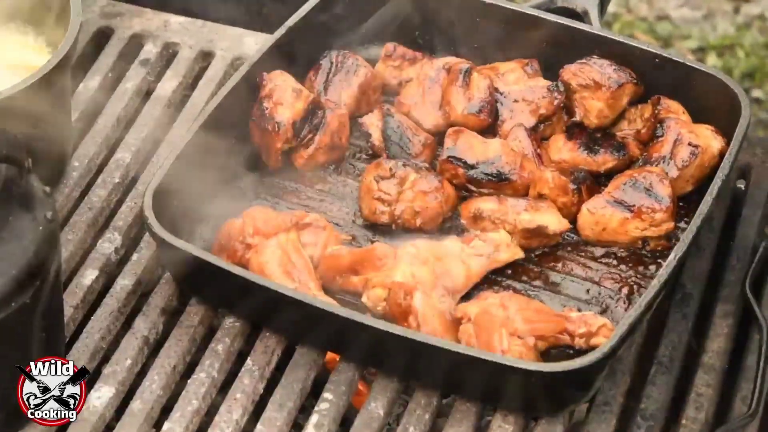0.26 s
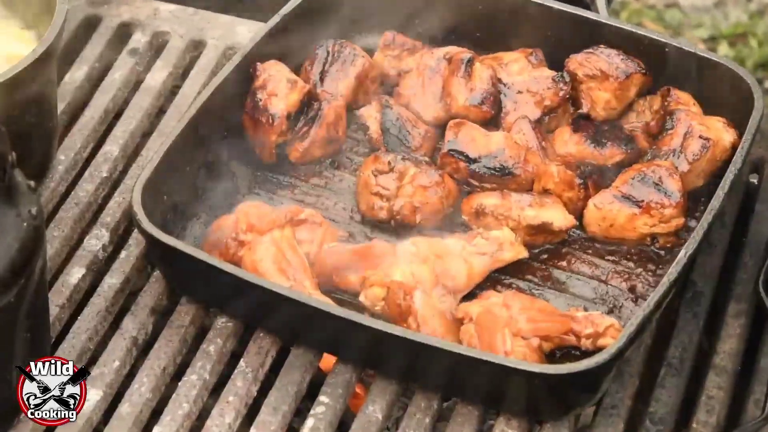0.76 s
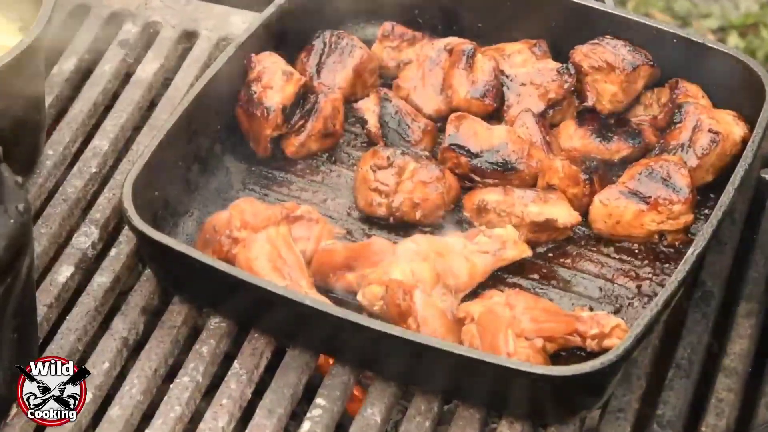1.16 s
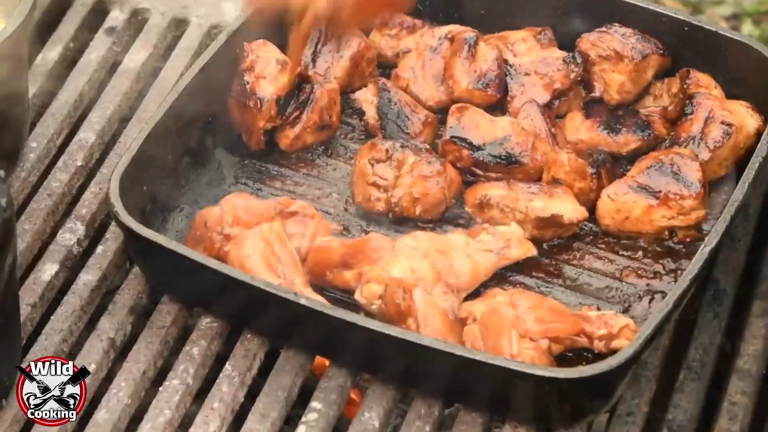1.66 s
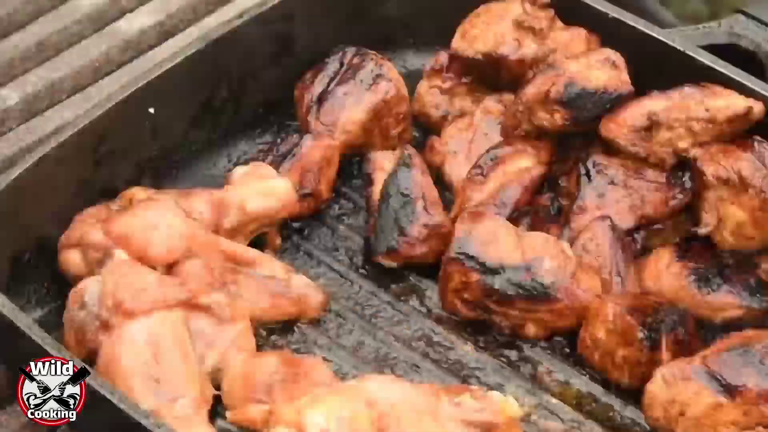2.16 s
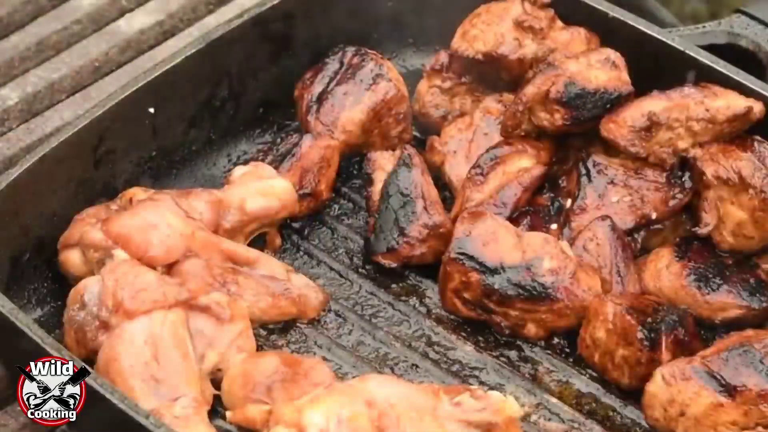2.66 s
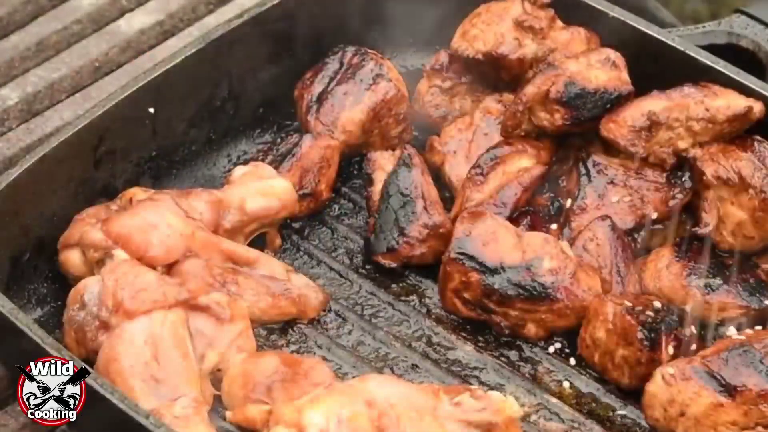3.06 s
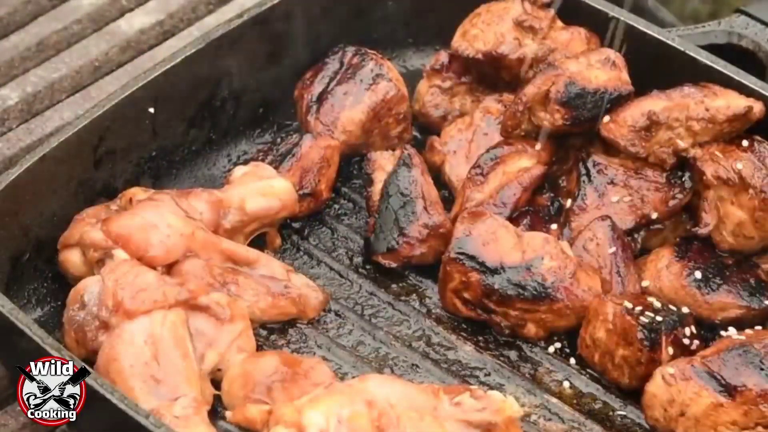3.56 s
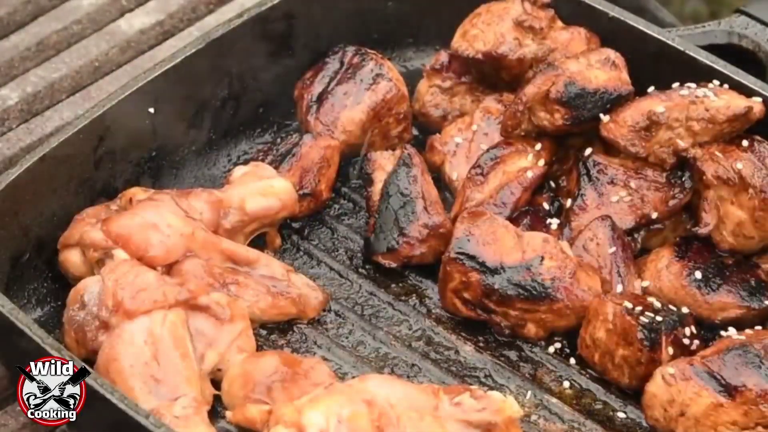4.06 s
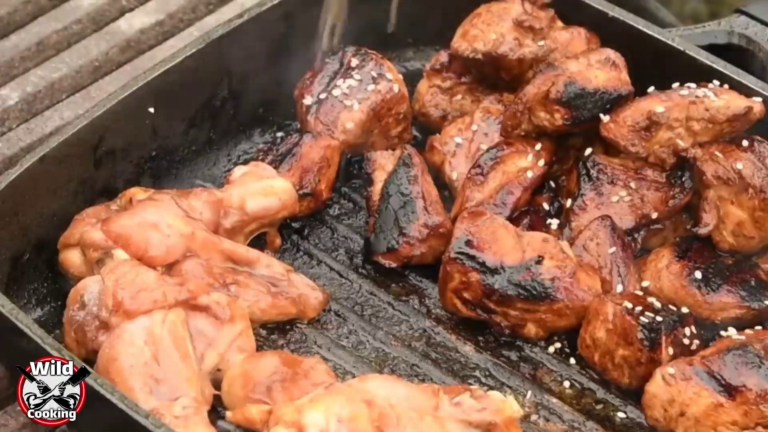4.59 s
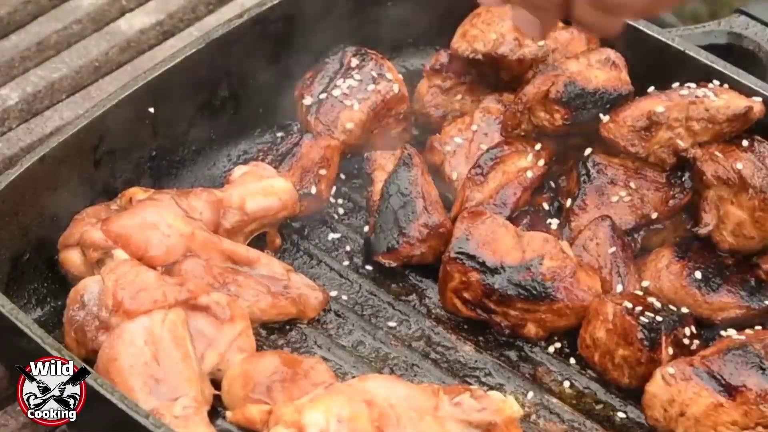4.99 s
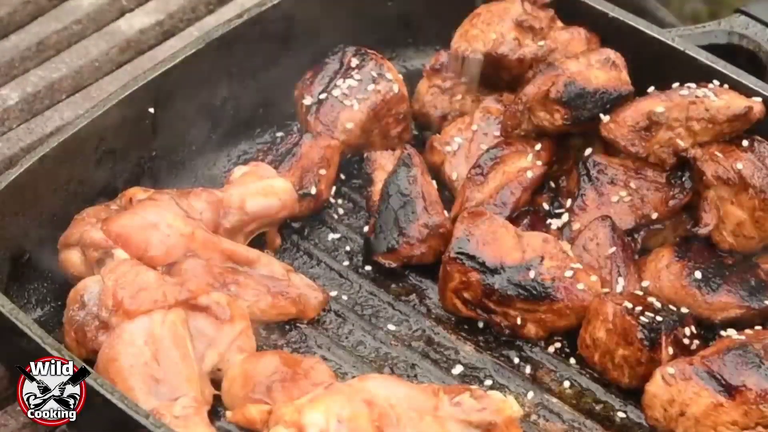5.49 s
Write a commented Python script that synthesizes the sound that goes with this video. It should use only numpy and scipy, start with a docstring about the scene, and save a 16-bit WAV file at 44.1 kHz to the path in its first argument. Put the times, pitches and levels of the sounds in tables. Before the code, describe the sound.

Close, bright sizzling of meat on cast iron surges, then settles lower, with sharp fat spits, soft knocks and a faint fire rumble.

```python
"""Chicken pieces sizzle in a cast-iron grill pan over an open fire, outdoors, close to a camera's mic.
Thousands of steam bubbles burst in the hot fat each second; a piece laid on the iron flares up. Near
2.35 s the level drops abruptly to a quieter, steady hiss. Single drops spit and a few dull knocks sound
over a low rumble of fire and air. A limiter ducks briefly after the loudest spits."""
import sys
import numpy as np
from scipy import signal
from scipy.fft import rfft, irfft
from scipy.io import wavfile
from scipy.ndimage import uniform_filter1d, minimum_filter1d

SR = 44100
rng = np.random.default_rng(int(sys.argv[2]) if len(sys.argv) > 2 else 0)


def digitize_waveform(pressure):
    """Quantize a signal to 16-bit integers and store it at the path in sys.argv[1].

    Rows of a 2-D input are taken as channels; values are limited to [-1, 1].
    """
    field = np.atleast_2d(pressure).T
    bounded = np.clip(field, -1, 1)
    quanta = np.round(bounded * 32767).astype(np.int16)
    wavfile.write(sys.argv[1], SR, quanta)


N = 252693
TIME = np.arange(N) / SR
HZ = np.fft.rfftfreq(N, 1 / SR) + 1e-3


# Level of the sizzle at the microphone; it drops abruptly near 2.35 s to a quieter, steady hiss.
# Each row: time in seconds, relative level in dB.
SIZZLE_LEVEL = [(0, 3.5), (.2, 1.5), (.42, 3), (.62, 0.5), (.77, .5), (.88, 3), (1.1, 2.2), (1.42, 3),
                (1.77, 2.5), (2.02, 2), (2.2, 4.5), (2.325, 3.5), (2.42, -0.8), (2.64, 0.5), (3.3, .5),
                (3.55, -0.8), (4.68, -.5), (4.85, 0), (5.4, -0.7)]
# Juices boil up under the meat in large bubbles, or the simmer briefly sinks back. # Each row: centre in
# seconds, half length in seconds, change of the simmer in dB.
SIMMER_CHANGES = [(.02, 0.046, 3.5), (.84, 0.066, 3.5), (1.14, 0.037, -5.5), (1.41, 0.014, 4),
                  (2.18, .08, -0.5), (2.68, 0.03, 2.7), (3.07, .06, 3), (3.38, 0.028, -2), (4.42, 0.03, 3),
                  (5.34, 0.037, -5.5)]

def frying(simmer_db=-33, bubbling_db=-29, sizzle_db=-24.5, spray_db=-33.5, mist_db=-49):
    """Wet meat on hot iron makes bubbles from large to fine, each at its own level, over a rumble."""
    sound = bubbles()
    level_db, boil_db, fine_db = follow(SIZZLE_LEVEL), swells(SIMMER_CHANGES), spray_change_db()
    edges = [lowpass(hz) for hz in (300, 1200, 2400, 4400, 10500)]
    bands = np.diff(edges, axis=0, prepend=0, append=1)
    bass, simmer, bubbling, sizzle, spray, mist = (unit_rms(filtered(sound, band)) for band in bands)
    return (simmer * gain_of(0.13 * level_db + boil_db + simmer_db)
            + bubbling * gain_of(0.83 * level_db + 0.27 * boil_db + bubbling_db)
            + pan_resonance(sizzle, level_db) * gain_of(level_db + 0.083 * fine_db + sizzle_db)
            + spray * gain_of(fine_db + spray_db)
            + mist * gain_of(1.42 * fine_db + mist_db)  # the finest mist grows faster than the spray
            + fire_rumble(bass))


# All the bursting bubbles, heard close to the pan. Each row: frequency in Hz, relative level in dB.
BUBBLE_SPECTRUM = [(30, -39), (55, -32.5), (100, -21), (150, -18.5), (180, -9.5), (310, -11), (1000, -6),
                   (1400, 1), (2600, 3), (3600, 2), (4800, -9.5), (8000, -20), (10000, -24.5),
                   (14000, -39.5)]

def bubbles(band_count=15, hiss_share=0.57, fizz_share=0.43, fizz_s=0.002):
    """Each size of bubble bursts around its own pitch; the finest burst most unevenly."""
    root_pitches = np.linspace(np.sqrt(200), np.sqrt(14000), band_count)
    width = 1.68 * (root_pitches[1] - root_pitches[0])
    bands = np.exp(-.5 * ((np.sqrt(HZ) - root_pitches[:, None]) / width) ** 2) + 1e-9
    bands /= np.linalg.norm(bands, axis=0)
    steam_db = 0.76 * flutter(seconds=0.027)  # steam escapes from under the meat in spurts
    fine_db = spray_change_db()
    hiss = hiss_share * gain_of(1.05 * (fine_db - fine_db.mean()))  # more spray crowds bursts into hiss
    fizz_decay = np.exp(-1 / (fizz_s * SR))
    out = np.zeros(N)
    for pitch, band in zip(root_pitches ** 2, bands):
        spread_db = np.interp(pitch, [500, 3500, 8000], [2.9, 2.7, 4.5])
        per_s = np.interp(pitch, [500, 3500, 8000], [800, 1400, 800])
        clicks = bursts(per_s, spread_db)
        # each burst throws droplets that fizz for a moment
        fizz_envelope = np.sqrt(signal.lfilter([1], [1, -fizz_decay], clicks ** 2))
        fizz = unit_rms(fizz_envelope * rng.standard_normal(N))
        crackle = unit_rms(clicks + fizz_share * fizz)
        blend = (crackle + hiss * rng.standard_normal(N)) / np.hypot(1, hiss)
        out += filtered(blend * gain_of(steam_db + 0.43 * flutter(seconds=0.011)), band)
    hz, db = np.transpose(BUBBLE_SPECTRUM)
    spectrum_db = np.interp(np.log(HZ), np.log(hz), db)
    return filtered(out, gain_of(spectrum_db + path_colour_db()))


def bursts(per_s, spread_db):
    """Bubbles pop as random clicks: very many small ones and a few large."""
    size = gain_of(spread_db * np.minimum(rng.exponential(1, N), 6))
    return unit_rms(size * rng.choice([-1, 1], N) * (rng.random(N) < per_s / SR))


# Juice runs onto the iron and flashes into fine spray, or the spray briefly runs dry. # Each row: centre in
# seconds, half length in seconds, change of the spray in dB.
SPRAY_CHANGES = [(.06, 0.18, 7.5), (.34, 0.04, 4), (.61, 0.096, 4.5), (1.08, 0.06, 6.5), (1.41, 0.044, 2),
                 (1.66, 0.08, 4), (1.89, 0.062, 5), (2.265, 0.094, 9.5), (3.32, 0.027, 1), (3.76, .04, 2.5),
                 (4.06, 0.032, -0.5), (4.44, 0.079, 3), (4.72, 0.03, -3), (4.86, 0.13, 2), (5.12, 0.049, 2),
                 (5.7, 0.17, 4)]

def spray_change_db(sizzle_share=0.48):
    """The fine spray follows its own flares and dips and, less strongly, the sizzle's level."""
    return swells(SPRAY_CHANGES) + sizzle_share * follow(SIZZLE_LEVEL)


def pan_resonance(sizzle, level_db, centre_hz=3100, width_hz=1260):
    """The pan's main resonance stands out more when the sizzle is louder."""
    core = filtered(sizzle, bump(centre_hz, width_hz))
    emphasis = gain_of(0.35 * level_db - 0.5)
    return core * emphasis + (sizzle - core) / emphasis


# Resonances between the pan and the microphone. Each row: centre in Hz, width in Hz, boost in dB.
PATH_RESONANCES = [(770, 260, 4), (3050, 380, 3.2), (3980, 450, 3), (5500, 650, 4.2), (7080, 600, 5.7),
                   (8820, 750, 6.3), (10720, 900, 7), (12800, 1050, 9.5), (14600, 550, 7), (15350, 380, 6)]

def path_colour_db():
    """The short path to the microphone lifts narrow parts of the spectrum."""
    return sum(db * bump(hz, width_hz) for hz, width_hz, db in PATH_RESONANCES)


# The loudest drops of fat, spitting close to the microphone.
# Each row: time in seconds, relative level in dB, pitch in Hz.
FAT_SPITS = [(.1143, 3.5, 4060), (.2582, 2, 3500), (.414, -4, 3300), (1.0824, 2, 3800), (1.1134, 1, 3300),
             (1.2328, -2, 2600), (1.532, 1, 3000), (1.7885, 1.5, 3100), (1.8288, -2.5, 5330),
             (1.829, -16, 11000), (1.9137, 1, 2600), (2.0783, -1.5, 3400), (2.4235, -23, 11000),
             (2.7996, 3, 2920), (2.8302, -12, 6500), (2.8618, 2.5, 2980), (2.9783, -18, 7660),
             (3.3307, 3, 3340), (3.5215, 4, 3000), (3.6702, -15, 7240), (3.7802, -8, 7200),
             (3.8033, -0.5, 2980), (4.0157, -4, 4600), (4.0704, -3, 2900), (4.1423, 0, 3360),
             (4.4666, 0, 2220), (4.4665, -6, 9200), (4.5483, 3.5, 3200), (4.6602, 4.5, 2500),
             (4.701, -4, 3180), (4.9576, 2.5, 3240), (5.0913, -18, 8700), (5.192, 2, 2700),
             (5.2971, -17, 7500), (5.3874, 3.5, 2980)]

def spits(half_length_s=0.00011, level_db=-4.5, echo_gain=0.34, echo_s=0.0012):
    """A drop bursts in a fraction of a millisecond; the pan walls throw it back twice."""
    out = np.zeros(N)
    for s, db, hz in FAT_SPITS:
        phase, path = rng.uniform(-0.93, 1, 2)
        delay_s = echo_s * (1 + 0.25 * path)
        for bounce in range(3):
            snap = wavelet(s + bounce * delay_s, hz, half_length_s, phase)
            out += gain_of(db) * echo_gain ** bounce * snap
    bass_cut = 1 - lowpass(710)  # the spits carry no bass
    return filtered(out, gain_of(level_db + path_colour_db()) * bass_cut)


# Dull knocks under the sizzle. Each row: time in seconds, peak level in dB, pitch in Hz.
DULL_KNOCKS = [(.185, -33, 240), (.340, -31, 208), (.397, -34, 192), (1.220, -28, 205.3), (1.362, -34, 233),
               (2.945, -28, 252), (3.10, -43, 105), (3.381, -29, 300), (3.578, -26.5, 202),
               (4.322, -23, 457), (4.378, -34, 150), (4.423, -25.5, 244), (4.652, -26, 208),
               (4.898, -30, 263), (4.923, -50, 95)]

def knocks(half_length_cycles=0.55):
    """Soft, heavily damped bumps with no ring; the lower ones last longer."""
    return sum(gain_of(db) * wavelet(s, hz, half_length_cycles / hz, rng.uniform(0, 2 * np.pi))
               for s, db, hz in DULL_KNOCKS)


# Fire and air in the background. Each row: time in seconds, level at the microphone in dB.
FIRE_LEVEL = [(0, -49), (2.3, -50.5), (2.85, -47.5), (3.1, -42.5), (3.35, -47), (4.5, -46.5), (5.73, -48)]

def fire_rumble(bass):
    """The low rumble of fire and air swells and sinks."""
    return bass * gain_of(follow(FIRE_LEVEL))


def gain_of(db):
    """Decibels to gain."""
    return 10 ** (np.asarray(db) / 20)


def unit_rms(x):
    """Scales to rms 1."""
    return x / np.sqrt(np.mean(x ** 2) + 1e-20)


def follow(rows):
    """A curve's value at every sample."""
    return np.interp(TIME, *np.transpose(rows))


def swells(rows):
    """Bell-shaped rises and dips in level, in dB at every sample."""
    return sum(db * np.exp(-.5 * ((TIME - s) / half_length_s) ** 2) for s, half_length_s, db in rows)


def filtered(x, gain):
    """Filters x by a gain for each frequency."""
    return irfft(rfft(x) * gain, N)


def lowpass(hz):
    """Gain of a smooth low-pass."""
    return 1 / (1 + (HZ / hz) ** 16)


def bump(hz, width_hz):
    """A bell on the spectrum, width_hz wide at half height."""
    return .5 ** ((2 * (HZ - hz) / width_hz) ** 2)


def flutter(seconds):
    """A smooth random wander of rms 1 that changes over the given time."""
    return unit_rms(filtered(rng.standard_normal(N), np.exp(-(HZ * seconds) ** 2)))


def wavelet(s, hz, half_length_s, phase):
    """One short swing of pressure under a bell-shaped envelope."""
    out = np.zeros(N)
    near = slice(*np.searchsorted(TIME, [s - 4 * half_length_s, s + 4 * half_length_s]))
    t = TIME[near] - s
    out[near] = np.exp(-.5 * (t / half_length_s) ** 2) * np.cos(2 * np.pi * hz * t + phase)
    return out


def limiter(x, threshold=0.63, hold_s=0.015, recovery_db_per_s=34, attack_samples=30):
    """On a loud peak the gain dips within a millisecond, holds, and recovers slowly."""
    over_db = 20 * np.log10(abs(signal.hilbert(x)) / threshold + 1e-9)
    half_hold = int(hold_s * SR / 2) + attack_samples
    held_db = -minimum_filter1d(-over_db, 2 * half_hold + 1, origin=half_hold - attack_samples // 4)
    recovery_db = TIME * recovery_db_per_s
    dip_db = np.maximum(np.maximum.accumulate(held_db + recovery_db) - recovery_db, 0)
    return x / gain_of(uniform_filter1d(dip_db, attack_samples))


def scene():
    """The pan at close range in the open air, with no room around it."""
    return (frying() + spits() + knocks())[None]


def record(dry, cutoff_hz=15620):
    """The camera's mono microphone feeds a limiter, then a steep treble roll-off."""
    roll_off = signal.firwin(511, cutoff_hz, window=("kaiser", 9), fs=SR)
    return signal.oaconvolve(limiter(dry[0]), roll_off, "same")[None]


dry = scene()
out = record(dry)
digitize_waveform(out)
```